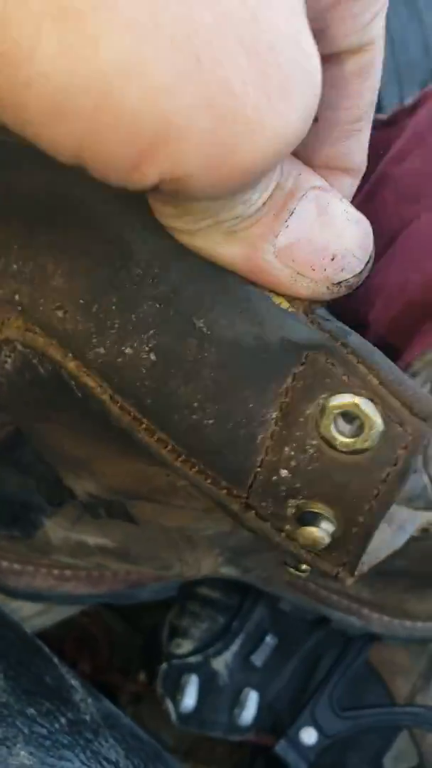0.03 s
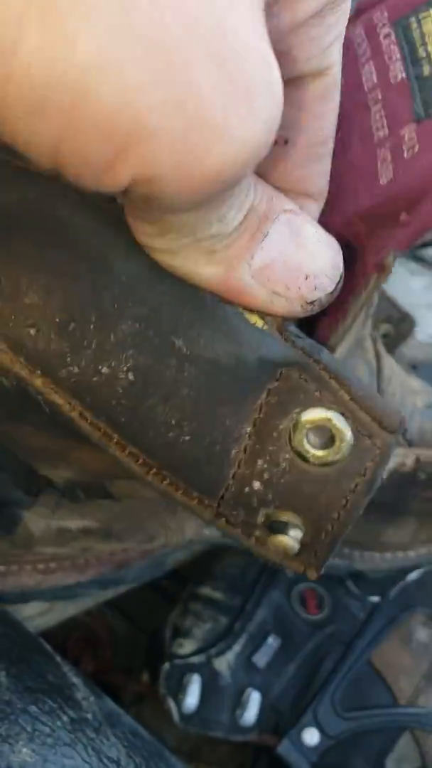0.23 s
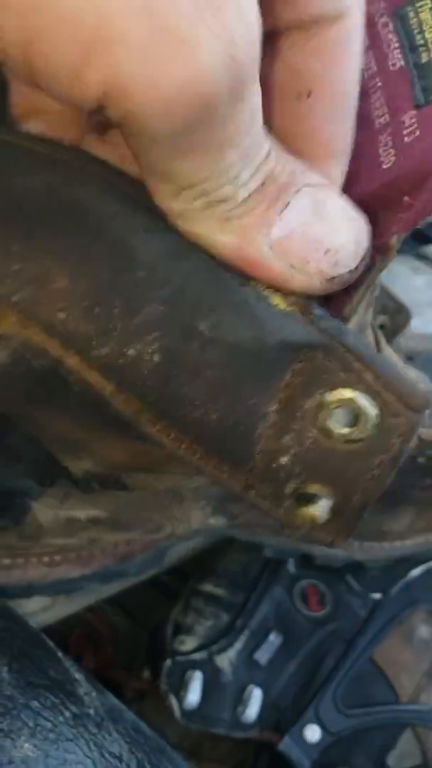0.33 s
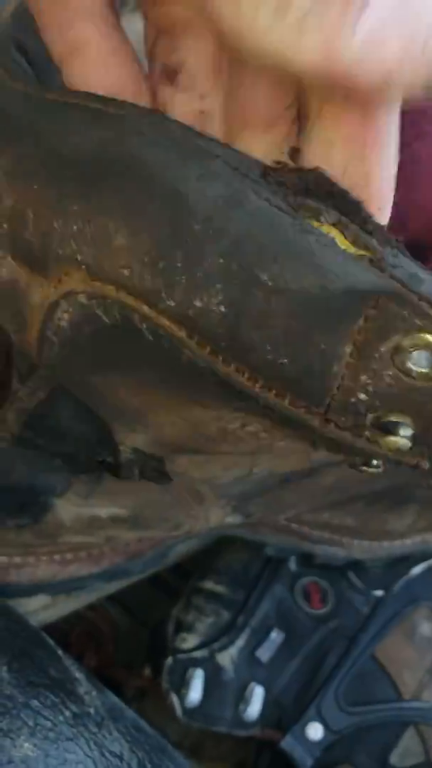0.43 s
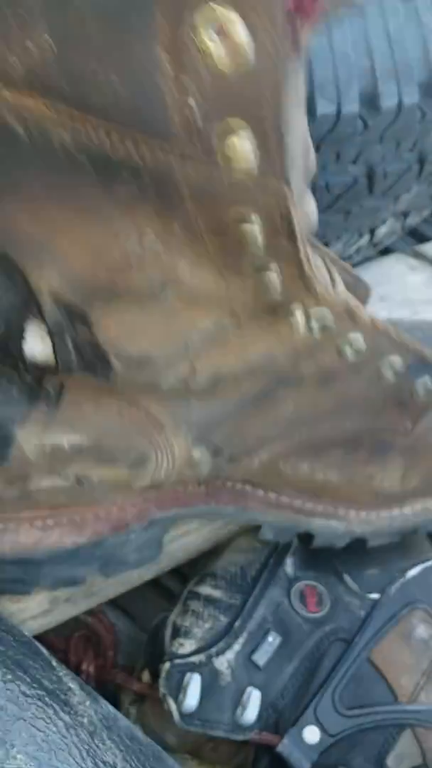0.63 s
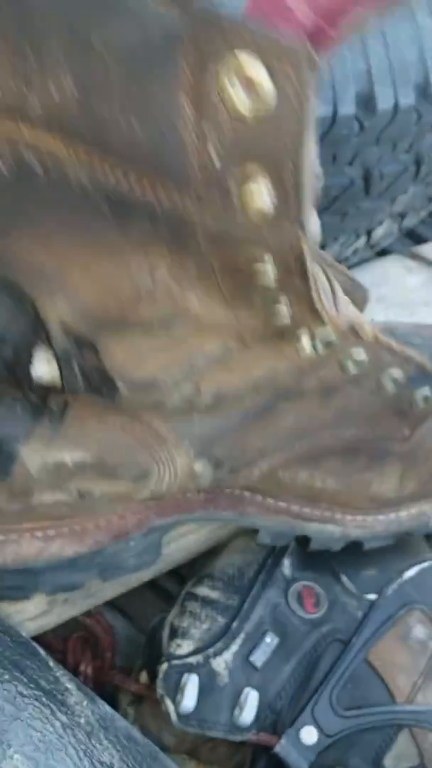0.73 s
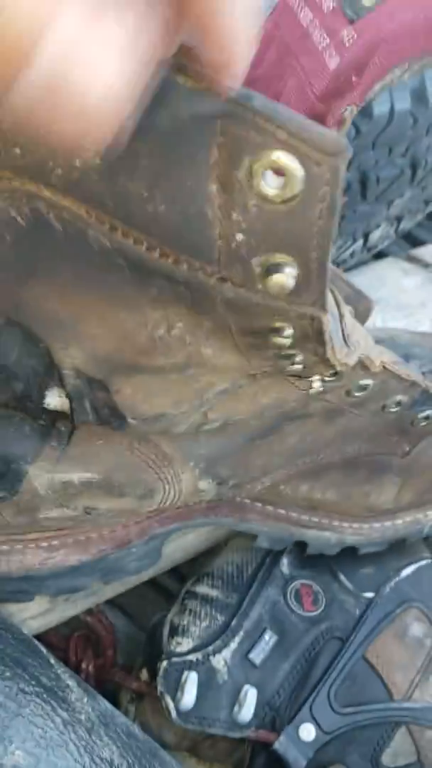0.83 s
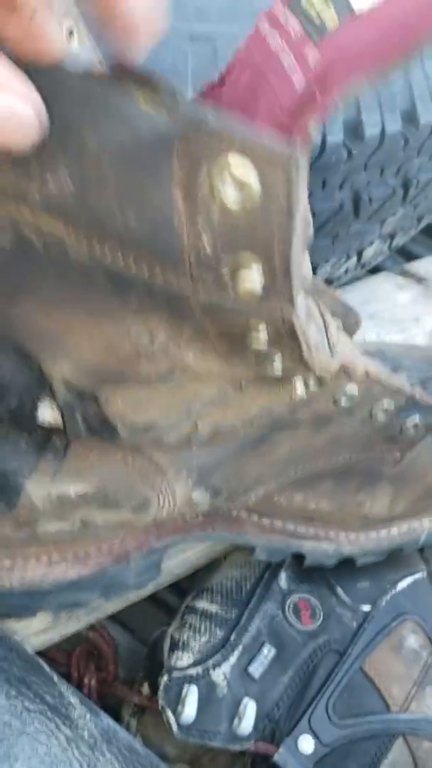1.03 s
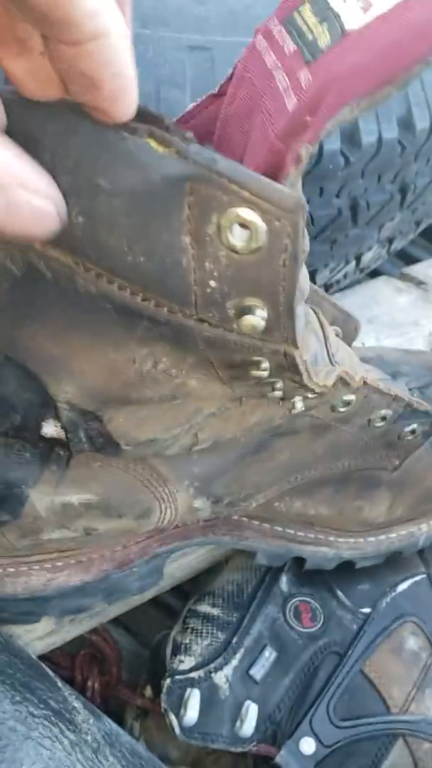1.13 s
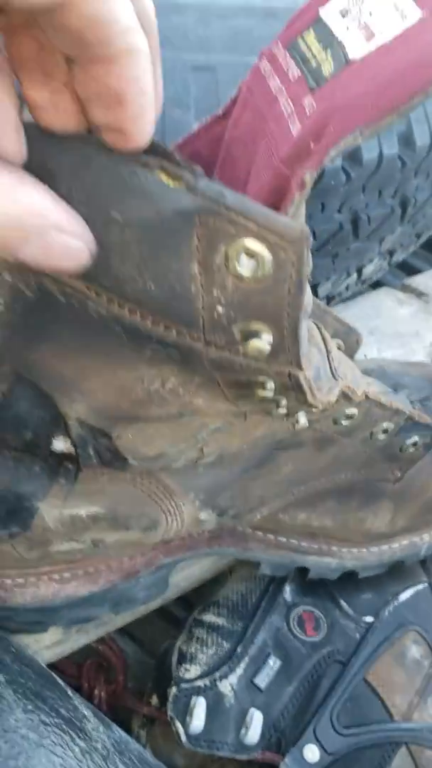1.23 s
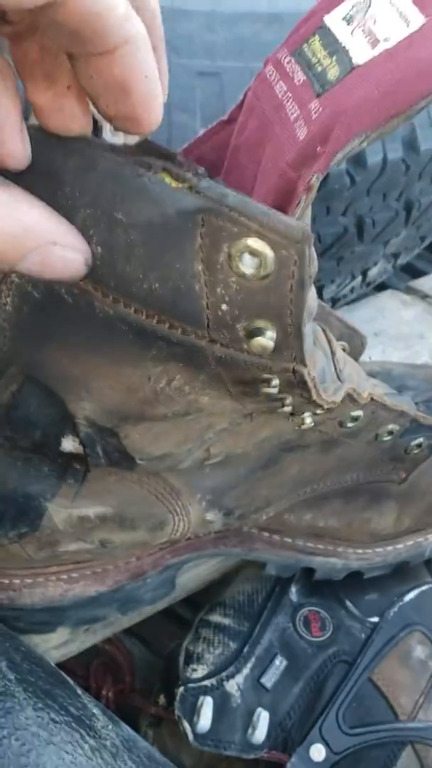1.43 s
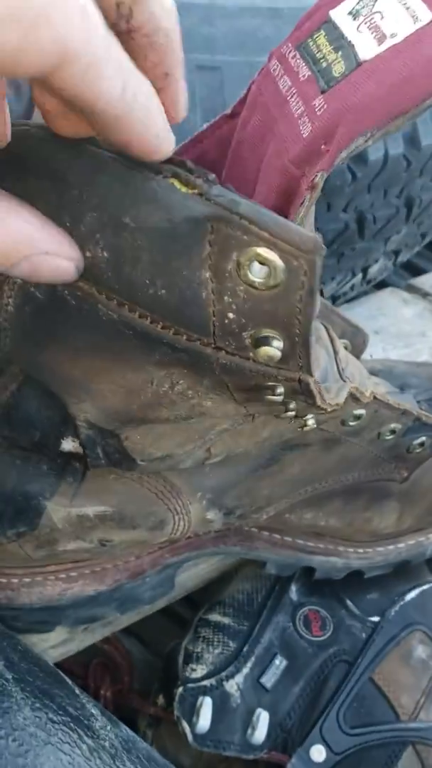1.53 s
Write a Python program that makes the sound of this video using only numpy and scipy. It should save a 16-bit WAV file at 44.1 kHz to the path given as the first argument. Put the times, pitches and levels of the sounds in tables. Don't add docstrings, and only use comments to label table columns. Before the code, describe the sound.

A stiff leather boot is gripped and flexed up close, knocking hollowly, creaking and rubbing in light wind

```python
import sys
import numpy as np
from scipy import signal
from scipy.fft import rfft, irfft
from scipy.io import wavfile
from scipy.ndimage import uniform_filter1d

SR = 44100
rng = np.random.default_rng(int(sys.argv[2]) if len(sys.argv) > 2 else 0)


def level_to_linear(level):
    exponent = np.asarray(level, float) / 20
    return 10 ** exponent


def bounce(signal):
    frames = np.transpose(np.atleast_2d(signal))
    limited = np.clip(frames, -1, 1)
    pcm = np.round(limited * 32767).astype(np.int16)
    wavfile.write(sys.argv[1], SR, pcm)


N = 70560
TIME = np.arange(N) / SR
SPACING_S = -0.0003414


def evened(x):
    return x / np.sqrt(np.mean(x ** 2) + 1e-20)


def colour(x, points):
    point_hz, db = np.transpose(points)
    hz = np.fft.rfftfreq(N, 1 / SR)
    gain = level_to_linear(np.interp(np.log(hz + 1), np.log(point_hz), db))
    return irfft(rfft(x) * gain, N)


def add(mix, start_s, sound):
    part = mix[..., max(round(start_s * SR), 0):][..., :sound.shape[-1]]
    part += sound[..., :part.shape[-1]]


def pair(x, pan_db, apart):
    hz = np.fft.rfftfreq(N, 1 / SR)
    shifted = irfft(rfft(x) * np.exp(-2j * np.pi * hz * SPACING_S), N)
    return (np.array([x, shifted]) + apart) * level_to_linear([[pan_db / 2], [-pan_db / 2]])


def patchy(patch_db):
    real, imag, patch = rng.standard_normal((N // 64 + 8, 129, 2, 3)).T
    patch = uniform_filter1d(patch[0], size=4, axis=0)
    patch = evened(uniform_filter1d(patch, size=24, axis=1))
    spectrum = (real + 1j * imag) * level_to_linear(patch_db * patch)
    return evened(signal.istft(spectrum, nperseg=256, noverlap=192)[1][:, :N])


def wind():
    # time in seconds, left level in dB, right level in dB.
    breeze = [(0, -44.5, -47), (0.152, -46, -41), (.3, -29.5, -39.5), (0.748, -27, -36),
              (0.819, -32.5, -35), (1.096, -32.5, -50.5), (1.3, -46.5, -43), (1.6, -43.5, -46.5)]
    # frequency in Hz, level in dB.
    breeze_colour = [(15, -21.5), (35, -0.5), (65, 0), (130, -11.5), (260, -20.5), (500, -34),
                     (1000, -72.5)]
    # middle in seconds, peak in dB, swirl frequency in Hz.
    puffs_left = [(0.312, -23, 106), (0.344, -19, 81.5), (0.389, -26, 81), (0.42, -32, 58.3),
                  (0.448, -14.5, 89), (0.499, -14.5, 108), (0.522, -23.5, 101), (0.546, -15, 75),
                  (0.604, -20, 103), (0.634, -19, 93), (0.677, -24.5, 103), (0.702, -24.5, 82),
                  (0.74, -19, 89), (0.764, -21, 87), (0.823, -33, 117), (0.852, -21, 56.4),
                  (0.899, -25, 102), (0.943, -28, 75), (0.979, -12.5, 114.5), (1.014, -34, 91.5),
                  (1.042, -26, 130), (1.09, -19, 98), (1.144, -19.5, 80.6), (1.195, -24.5, 76.4),
                  (1.237, -27, 69.4), (1.311, -20.5, 122.5), (1.389, -28.5, 57.4), (1.508, -33, 57),
                  (1.597, -35.5, 68.4)]
    # middle in seconds, peak in dB, swirl frequency in Hz.
    puffs_right = [(0.293, -27, 155), (0.319, -26, 133), (0.405, -35, 93), (0.474, -17, 79),
                   (.517, -22.5, 97.4), (0.611, -35.5, 85), (0.709, -28.5, 106), (.919, -30.5, 81),
                   (0.988, -28.5, 92), (1.087, -35, 57.7), (1.13, -31.5, 60), (1.26, -34.5, 66.4),
                   (1.348, -32.5, 69.6)]
    puff_turns, sag, eddy_db, eddy_ratio = 0.58, 0.8, -6.5, 1.94
    half = 3 * SR // 50

    s, left_db, right_db = np.transpose(breeze)
    out = evened(colour(rng.standard_normal((2, N)), breeze_colour))
    out = out * level_to_linear([np.interp(TIME, s, left_db), np.interp(TIME, s, right_db)])
    for port, puffs in enumerate((puffs_left, puffs_right)):
        phases = rng.random((len(puffs), 2))
        for (at, db, hz), (swirl_phase, eddy_phase) in zip(puffs, phases):
            u = np.arange(-half, half) / SR * hz
            turns = u - sag * np.log(np.cosh(u))
            swirl = np.cos(2 * np.pi * (turns + swirl_phase)) * np.exp(-0.5 * (u / puff_turns) ** 2)
            eddy = np.cos(2 * np.pi * (eddy_ratio * turns + eddy_phase))
            eddy = eddy * np.exp(-2 * (u / puff_turns) ** 2)
            add(out[port], at - 3 / 50, level_to_linear(db) * (swirl + level_to_linear(eddy_db) * eddy))
    return out


def cabin_hush():
    # frequency in Hz, level in dB.
    cabin_colour = [(60, -28), (280, 10.5), (600, -3.5), (1000, 1.5), (1700, -7), (2000, -19.5),
                    (5000, -21.5), (16000, -27)]
    return level_to_linear(-62) * evened(colour(patchy(2.0), cabin_colour))


def lining_squeaks():
    # start in seconds, length in seconds, from Hz, to Hz, level in dB.
    squeak_list = [
        (0.784, 0.16, 9100, 10350, -65.5),
        (0.832, 0.11, 12500, 12700, -66),
    ]
    out = np.zeros(N)
    for at, length, from_hz, to_hz, db in squeak_list:
        u = np.arange(0, length, 1 / SR) / length
        waver = evened(uniform_filter1d(rng.standard_normal((2, N)), size=200))[:, :len(u)]
        hz = from_hz + (to_hz - from_hz) * np.sin(np.pi * u / 2) + 130 * waver[0]
        tone = np.sin(2 * np.pi * np.cumsum(hz) / SR)
        add(out, at, level_to_linear(db + 1.9 * waver[1]) * np.sin(np.pi * u) * tone)
    return out


def rub():
    # time in seconds, level in dB, brightness in dB.
    strokes = [(0, -72.5, -9), (.1, -67, -14.5), (0.162, -59.5, -0.5), (0.267, -58, -16), (.3, -76.5, -5),
               (0.381, -62, -37), (0.426, -77, -45), (0.449, -55, -22), (.5, -64, 2.5), (0.541, -86, -32),
               (0.601, -87, 4), (0.658, -69, 1), (0.739, -67, -10.5), (.91, -65.5, -4.5), (1.021, -63, -20),
               (1.18, -102, -13), (1.4, -77.5, 0.5), (1.55, -70.5, -5)]
    # frequency in Hz, level in dB.
    rub_colour = [(500, -10), (900, 5.5), (1600, -2.5), (2150, -9.5), (3000, -8), (5000, -11), (10000, -11),
                  (16000, -2.5)]
    same, patch_db, grit_db = 0.84, -1.5, 3.5

    s, db, bright_db = np.transpose(strokes)
    grit = level_to_linear(grit_db * evened(uniform_filter1d(rng.standard_normal(N), size=90)))
    hiss = evened(colour(patchy(patch_db) * grit, rub_colour))
    treble = signal.sosfiltfilt(signal.butter(4, 8400, "high", fs=SR, output="sos"), hiss)
    hiss = hiss + treble * (level_to_linear(np.interp(TIME, s, bright_db)) - 1)
    hiss = hiss * level_to_linear(np.interp(TIME, s, db) + 9.0)
    apart = np.sqrt(1 - same ** 2) * np.array([hiss[1], np.roll(hiss[1], 999)])
    return pair(same * hiss[0] + lining_squeaks(), -1.9, apart)


def ticks():
    # start in seconds, peak in dB, pitch in Hz, dull snap in dB, left-right balance in dB.
    tick_list = [(0.0708, -50, 5200, -45, 10), (0.0944, -45, 5800, -46, 4.5), (.119, -47, 6600, -41, 9),
                 (.1195, -45.5, 12500, -73, 1), (0.152, -35, 13400, -34.5, 7), (.1515, -31, 7500, -58, 8),
                 (0.163, -37, 11500, -45, -4), (0.165, -47, 5500, -58, 1), (.194, -19, 12900, -40.5, 0.5),
                 (0.1941, -33.5, 4600, -41, -3), (0.254, -50, 12900, -69, -7), (.322, -53, 5000, -68, -11),
                 (.333, -47, 5600, -58, -5), (0.3714, -50, 4150, -52, -16), (0.4473, -37.5, 4600, -35, -12),
                 (0.451, -36, 4800, -60, -20), (0.7594, -37, 6300, -50, 3),
                 (0.7642, -23.5, 15000, -69, -10), (0.766, -49, 14500, -67, -27),
                 (0.8465, -31, 6600, -75, -2), (.932, -28, 4900, -26.5, -13.5), (0.97, -39, 2870, -49, -19),
                 (0.9774, -51, 15000, -25.5, -14), (0.9785, -51, 4700, -44, -14),
                 (.982, -35.5, 2300, -30.5, -6), (1.0129, -36.5, 4900, -24, -12.5),
                 (1.3522, -33, 6900, -65, 29)]
    tick_q, tick_turns = 1.8, 0.62
    snap_hz, thud_hz, thud_t60, thud_db = 2460, 505, 0.01, -4
    tail_db, tail_t60 = -16, 0.029
    scatter_s, scatter_db = 0.0015, -25.5

    out, t = np.zeros((2, N)), TIME[:SR // 20]
    swing = 2 * np.pi * snap_hz * t
    snap_shape = swing ** 2 * (2 - 0.5 * swing) * np.exp(-swing)
    thud = level_to_linear(thud_db - 60 * t / thud_t60) * np.sin(2 * np.pi * thud_hz * t)
    noises = rng.standard_normal((len(tick_list), 2, len(t)))
    spots = rng.random((len(tick_list), 2, 7))
    for (at, db, hz, snap_db, pan_db), noise, spot in zip(tick_list, noises, spots):
        u = t * hz / tick_turns
        ring = level_to_linear(db) * u * np.exp(1 - u) * np.sin(2 * np.pi * hz * t)
        snap = level_to_linear(snap_db) * (snap_shape + thud)

        taps = np.zeros((2, 200))
        place = np.clip(spot * scatter_s * SR, 3, 199).astype(int)
        np.put_along_axis(taps, place, np.sign(noise[:, :7]) * level_to_linear(scatter_db * spot), 1)
        taps[:, 0] = 0.57
        taps = taps / np.linalg.norm(taps, axis=1)[:, None]
        direct = signal.fftconvolve((ring - snap)[None], taps, axes=1)[:, :len(t)]

        band = evened(signal.lfilter(*signal.iirpeak(min(hz, SR / 2.5), tick_q, SR), noise))
        dull = uniform_filter1d(noise[::-1], size=7)
        tail = level_to_linear(tail_db - 60 * t / tail_t60) * (level_to_linear(db) * band + level_to_linear(snap_db + 3.5) * dull)
        both = np.array([np.roll(direct[0], -round(SPACING_S * SR)), direct[1]])
        both = both + tail * np.minimum(t * 2000, 1)
        add(out, at, both * level_to_linear([[min(pan_db, 0)], [min(-pan_db, 0)]]))
    return out


def pops():
    # start in seconds, level in dB, pitch in Hz, time to fall 60 dB in seconds.
    pop_list = [(.152, -49, 1326, 0.027), (.2555, -55, 1390, 0.012), (.33, -43.5, 1035, 0.038),
                (.371, -39, 1206, 0.024), (.396, -45.5, 996, 0.037), (.4465, -42, 630, 0.014),
                (.4565, -29.5, 830, 0.01), (.479, -44, 1580, 0.022), (.553, -43.5, 726, 0.013),
                (.664, -43, 1610, 0.019), (.9325, -35.5, 580, 0.017), (1.012, -36, 425, 0.012),
                (1.101, -53.5, 1480, 0.028)]
    out, t = np.zeros(N), TIME[:SR // 15]
    for at, db, hz, t60 in pop_list:
        tones = np.sin(2 * np.pi * hz * t) + 0.34 * np.sin(2 * np.pi * 1.188 * hz * t)
        add(out, at, level_to_linear(db - 60 * t / t60) * np.minimum(t / 0.0014, 1) * tones)
    return pair(out, -13, 0)


def creaks():
    # start in seconds, length in seconds, level in dB.
    creak_list = [
        (0.207, 0.13, -38),
        (0.32, 0.096, -50),
        (0.354, 0.18, -49),
        (0.437, 0.1, -38.5),
        (0.544, 0.1, -53.5),
        (0.661, 0.057, -41.5),
        (1.007, 0.029, -40.5),
        (1.055, 0.13, -56),
    ]
    # frequency in Hz, level in dB.
    creak_colour = [(80, -42), (250, 4.5), (600, -13), (850, -13.5), (1150, -15), (1500, -18.5),
                    (2600, -37), (4000, -59)]
    slips_per_s, spread_db, rise = 3200, 4, 0.21

    swell = np.zeros(N)
    for at, length, db in creak_list:
        u = np.arange(0, 2 * length, 1 / SR) / (length * rise)
        add(swell, at, level_to_linear(db) * u * np.exp(1 - u))
    slips = rng.standard_normal((3, N)) * (rng.random((3, N)) < slips_per_s / SR)
    slips = slips * level_to_linear(spread_db * np.minimum(rng.exponential(1, (3, N)), 4))
    body = swell * evened(colour(slips, creak_colour))
    return pair(body[0], -4.3, 0.5 * body[1:])


def knocks():
    # frequency in Hz, level in dB, time to fall 60 dB in seconds.
    shaft = [(204.1, -4.5, 0.059), (238, -9.5, 0.13), (362.2, -1, 0.059), (435.6, -5.5, .04),
             (556, -9, 0.043), (616, -32.5, 0.033), (843, -27, 0.022), (956, -20, 0.086)]
    # start in seconds, level in dB, contact time in seconds.
    blows = [(.2182, -12.5, 0.00052), (.2232, -16, 0.0015), (0.227, -14.5, .002), (.232, -17.5, 0.0017),
             (0.2366, -37, .0015), (.249, -11.5, 0.0035), (.259, -17.5, 0.0029), (0.263, -24, 0.0016),
             (.446, -32, 0.0027), (0.453, -28, .0006), (0.464, -22.5, 0.0011), (0.473, -21, 0.0035),
             (.482, -26.5, 0.0029), (.495, -28.5, 0.0017), (.585, -36.5, .005), (0.626, -23.5, 0.0047),
             (.657, -18.5, 0.00324), (.665, -33.5, 0.0014), (0.685, -33.5, 0.0013), (.738, -23, 0.0056)]
    push, t = np.zeros(N), TIME[:SR // 5]
    for at, db, contact in blows:
        bump = np.sin(np.pi * np.arange(0, contact, 1 / SR) / contact) ** 2
        add(push, at, level_to_linear(db) * bump / bump.sum())

    rings = []
    for hz, db, t60 in shaft:
        tone = np.cos(2 * np.pi * hz * t) * np.minimum(t / 0.0021, 1)
        rings.append(level_to_linear(db - 60 * t / t60) * tone)
    apart = []
    for _ in range(2):
        mixed = rng.choice([-1.0, 1.0], len(shaft)) @ rings
        apart.append(signal.oaconvolve(push, mixed)[:N])
    return pair(-signal.oaconvolve(push, sum(rings))[:N], -1, level_to_linear(-12) * np.array(apart))


def whispers():
    # start in seconds, length in seconds, pitch in Hz, level in dB.
    whisper_list = [
        (0.521, 0.22, 2150, -73.5),
        (.73, 0.3, 2050, -68),
        (.8, 0.16, 4630, -82),
        (1.323, 0.077, 3600, -69),
        (1.356, 0.34, 2176, -73.5),
        (1.355, 0.34, 4420, -76.5),
        (1.363, 0.48, 9850, -73),
        (.62, 0.073, 7460, -70),
    ]
    out = np.zeros((2, N))
    noises = rng.standard_normal((len(whisper_list), 2, SR // 2))
    for (at, length, hz, db), noise in zip(whisper_list, noises):
        swell = np.sqrt(np.sin(np.pi * np.arange(0, length, 1 / SR) / length).clip(0))
        b, a = signal.iirpeak(hz, 6.7, SR)
        narrow = evened(signal.lfilter(b, a, signal.lfilter(b, a, noise)))
        add(out, at, level_to_linear(db) * swell * narrow[:, :len(swell)])
    return out


def scene():
    # frequency in Hz, width in Hz, gain in dB.
    port_shape = [(2150, 160, 3), (3500, 330, -11), (4550, 400, 3), (8500, 450, -9)]
    hz = np.fft.rfftfreq(N, 1 / SR)
    port_db = sum(db * np.exp(-0.5 * ((hz - at_hz) / width) ** 2) for at_hz, width, db in port_shape)
    port = level_to_linear(port_db) * (hz < 16900)
    steady = rfft(rub() + cabin_hush() + creaks() + whispers())
    steady = steady * level_to_linear(-20 * (hz > 15900))
    sudden = rfft(ticks() + pops() + knocks())
    return wind() + irfft((steady + sudden) * port, N)


def low_pass(x):
    return signal.sosfilt(signal.butter(12, 17160, fs=SR, output="sos"), x)


def record(dry):
    bass_cut = signal.butter(4, 42, "high", fs=SR, output="sos")
    return low_pass(signal.sosfilt(bass_cut, dry))


dry = scene()
out = record(dry)
bounce(out)
```